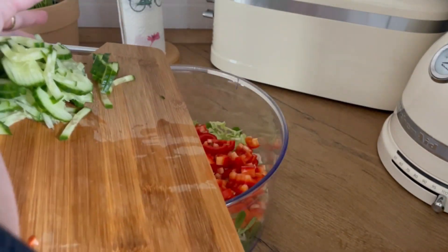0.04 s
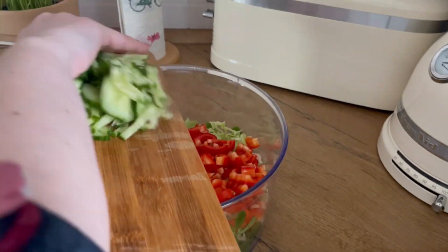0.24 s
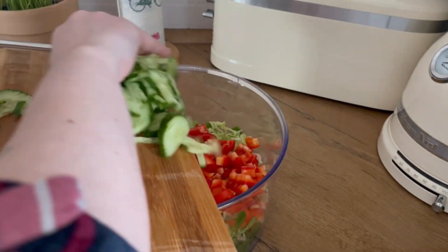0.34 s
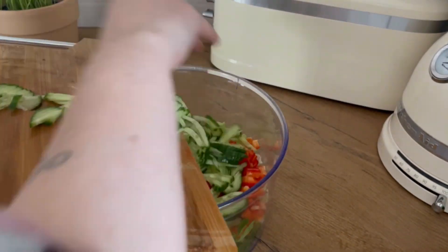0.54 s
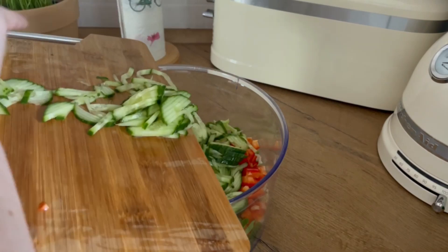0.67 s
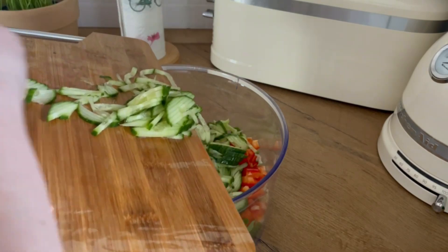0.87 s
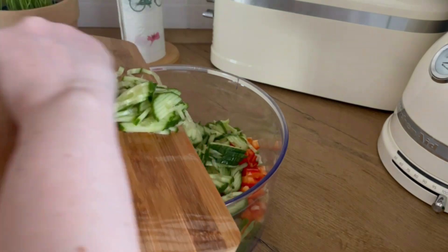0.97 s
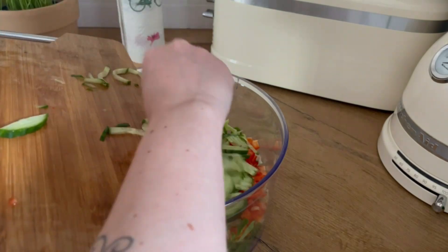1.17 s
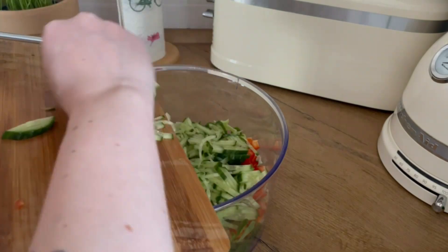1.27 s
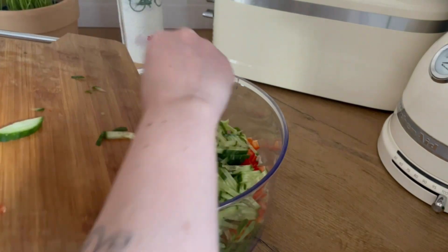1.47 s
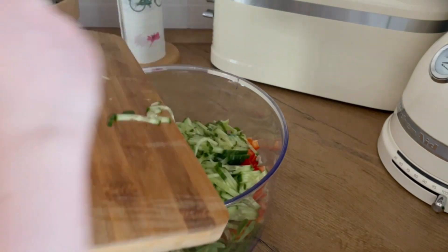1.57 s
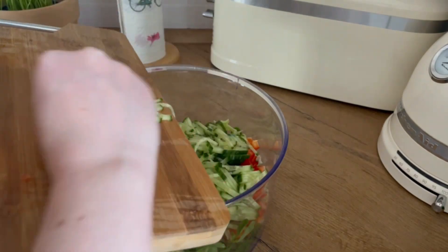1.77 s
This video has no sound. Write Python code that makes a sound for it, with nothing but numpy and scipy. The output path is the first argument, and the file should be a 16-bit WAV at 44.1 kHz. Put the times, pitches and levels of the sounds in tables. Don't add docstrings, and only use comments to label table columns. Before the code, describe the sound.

Chopped cucumber is scraped off a wooden board with a steel blade; a quick cluster of pieces thuds into a plastic bowl, then more scrapes and sharp metallic taps follow, close up in a quiet, humming kitchen.

```python
import sys
import numpy as np
from scipy import signal
from scipy.fft import rfft, irfft
from scipy.io import wavfile
from scipy.ndimage import uniform_filter1d

SR = 44100
rng = np.random.default_rng(int(sys.argv[2]) if len(sys.argv) > 2 else 0)


def boost(x):
    u = np.asarray(x, float) / 20
    return 10 ** u


def transcribe(signal):
    frames = np.atleast_2d(signal).T
    limited = np.clip(frames, -1, 1)
    pcm = np.round(limited * 32767).astype(np.int16)
    wavfile.write(sys.argv[1], SR, pcm)


N = 81585

# (frequency [Hz], density [dB per Hz])
FLOOR_SPECTRUM = [(60, -7), (150, -3.5), (225, 2), (320, -8.5), (440, -3), (900, -14), (2500, -29.5),
                  (16000, -46)]
FLOOR_DB = -61
HUM_HZ, HUM_DB, SECOND_HUM_DB = 117.3, -56, -5
BEAT_S, FIRST_DIP_S = 0.2836, 0.23

# (time [s], pressure [dB], wet hiss brightness [dB])
SWEEP_1 = [(0, -67, -8), (.025, -61, -4.5), (.055, -68, -11.5), (.126, -54, -3), (.195, -52.5, -10.5),
           (.228, -53.5, 3), (.288, -50.5, -12.5)]
SWEEP_2 = [(0.3, -58.5, -4.5), (0.326, -53.5, -2.5), (.4, -54.5, -11), (.44, -61.5, -1), (.52, -62, -6.5),
           (.535, -68, -13), (.575, -63.5, -5), (.6, -76, -8), (0.64, -69, -11)]
SWEEP_3 = [(0.675, -60.5, -14), (0.715, -71, -34), (0.814, -67, -30)]
SWEEP_4 = [(0.834, -48, -2), (0.849, -59, -2), (.875, -46.5, -12.5), (0.914, -53.5, -10), (.95, -49, -4),
           (.995, -53, -2), (1.113, -52.5, 0), (1.146, -46, -14), (1.159, -61.5, -10)]
SWEEP_5 = [(1.17, -66, -8), (1.19, -67.5, -19), (1.22, -60, -23), (1.245, -63, -24), (1.26, -75, -20),
           (1.292, -77, -19)]
SWEEP_6 = [(1.312, -59, -12), (1.325, -61.5, -8), (1.365, -55, -12), (1.38, -58.5, -7), (1.393, -54, -6),
           (1.406, -54, -4.5), (1.418, -49.5, -3), (1.428, -71, -7), (1.468, -87, -3)]
SWEEP_7 = [(1.661, -50, -7), (1.70, -46.5, -7), (1.74, -52, -12), (1.762, -62.5, 6.5), (1.78, -55.5, -3),
           (1.81, -55, -8), (1.82, -49.5, -6.5), (1.835, -52, -9), (1.85, -46, -13)]
# (frequency [Hz], density [dB per Hz])
RUB_SPECTRUM = [(180, -33), (300, -7.5), (360, -10), (447, -10.5), (1210, -5), (1340, -1.5), (2320, -12),
                (3240, -12.5), (16000, -8.5)]
# (frequency [Hz], width [Hz], level [dB])
BLADE_MODES = [(1335.6, 37, -0.5), (1624, 30, -6), (2730, 190, 4), (3166, 58, 5), (3715, 80, 0.5),
               (3860, 40, -3), (4124, 60, -9), (5115, 41, -7), (5147, 87, -1), (5910, 84, -13),
               (6410, 60, -2.5), (8060, 60, -7), (9590, 110, -11.5), (10480, 160, -12)]
GRIT_DB, GRIT_PER_S, PATCH_DB = 1, 2500, 2.5
RUB_RING_DB, GRIP_WANDER_DB = -4, 4

# (time [s], length
# [s], level [dB], first pitch [Hz], last pitch [Hz])
BOWL_BOOMS = [(0.237, 0.02, -31.5, 246, 241.5), (0.261, 0.025, -29.5, 244, 257),
              (0.298, 0.05, -44.5, 251, 231.6), (0.378, 0.021, -46.5, 244, 245),
              (0.412, 0.022, -44, 253, 242), (0.469, 0.021, -47.5, 225, 235),
              (0.509, 0.0266, -56.5, 237, 234), (0.798, 0.04, -49.5, 262, 237.4),
              (0.921, 0.019, -55.5, 237, 244), (0.992, 0.019, -47.5, 240, 217),
              (1.022, 0.028, -50.5, 201, 240), (1.161, 0.043, -52, 266, 251),
              (1.205, 0.042, -59.5, 256, 259), (.005, 0.036, -54.5, 242, 198.5),
              (.07, 0.038, -60.5, 203, 190), (.14, .03, -62, 195, 224)]
BOOM_RISE_FRACTION, BOOM_ROUGH_DB = 0.21, 2.5

# (time [s], level [dB], brightness [dB], one favoured ring [Hz], other favoured ring [Hz])
EDGE_TAPS = [(.030, -58, -6, 8100, 3150), (0.1, -49.5, 1, 6430, 3200), (0.2, -39, 8, 3080, 1380),
             (0.421, -58, -28, 5300, 5200), (0.436, -45.5, 4, 6760, 6400), (0.643, -49.5, -28, 3170, 3200),
             (0.6596, -35.5, -9, 3860, 3330), (0.8224, -25.5, 7.5, 4140, 6850),
             (1.2989, -35.5, 1.5, 3060, 1430), (1.45, -55.5, 8, 7100, 7100), (1.6502, -33, 16, 3860, 1290)]
CRACK_T60_S, TAP_RING_T60_S, TAP_RISE_S = 0.034, 0.025, 0.00028
TAP_RING_DB, TAP_FOCUS_DB = 3.5, 11
TAP_MODE_SCALE, TAP_DAMPING_POWER = 0.38, 0.21

# (time [s], frequency [Hz], level [dB], length [s], width [Hz])
BLADE_CATCHES = [(0.16, 3320, -59, 0.029, 150), (0.193, 5100, -57, 0.0073, 230),
                 (0.715, 5130, -69.5, 0.12, 300), (1.212, 4920, -66.5, 0.089, 500),
                 (0.497, 5000, -58, 0.052, 700), (0.555, 4200, -62, 0.025, 60),
                 (0.631, 3060, -68, 0.0067, 140), (.49, 2700, -61.5, 0.052, 300),
                 (1.387, 14600, -66, 0.04, 2500), (0.874, 3900, -54, 0.017, 120),
                 (0.949, 5120, -48, 0.011, 150), (0.97, 3080, -54.5, 0.027, 50),
                 (1.137, 5080, -50.5, 0.015, 200), (1.144, 2780, -52, 0.011, 250),
                 (1.08, 1345, -59.5, 0.069, 50), (1.087, 3715, -70, 0.043, 70),
                 (1.365, 3160, -52, 0.0077, 141), (1.403, 5210, -56, 0.019, 229),
                 (1.41, 3770, -52, 0.013, 172), (1.68, 1330, -56, 0.037, 150),
                 (1.701, 3660, -41.5, 0.013, 200), (1.706, 3230, -51, 0.035, 150),
                 (1.725, 2830, -56, 0.027, 200), (1.777, 6800, -53.5, 0.009, 500),
                 (1.814, 3780, -57, 0.015, 150), (1.83, 6480, -53.5, 0.06, 250)]

# (frequency [Hz], t60 [s], level [dB])
BOWL_MODES = [(500, 0.034, 0), (618, 0.063, -10.5), (702, 0.054, -4), (845, 0.017, -7), (945, 0.021, 6),
              (1073, 0.026, 0), (1310, 0.018, 0.5), (1873, 0.022, -3), (2720, 0.02, -8), (3010, 0.017, -4),
              (3364, 0.014, -13.5)]
# (time [s], wall level [dB], click level [dB], favoured wall pitch [Hz])
PIECE_DROPS = [(0.2336, -30, -24.5, 875), (.237, -20.5, -19, 816), (.241, -26, -25.5, 960),
               (.249, -32, -32, 804), (.258, -19.5, -28, 810), (.263, -21, -32, 940), (.268, -22, -28, 795),
               (.274, -29.5, -36, 750), (.282, -29, -42, 684), (.289, -34, -47, 960), (.296, -44, -39, 900),
               (.315, -38.5, -69, 690), (0.363, -44, -70, 1120), (.404, -37.5, -62, 710),
               (.412, -40.5, -64, 905), (.515, -50.5, -48.5, 850), (.772, -49, -55.5, 910),
               (.8235, -39.5, -51, 950), (0.995, -46, -69, 607), (1.161, -45, -64, 610),
               (.2905, -38, -50, 1040), (.435, -46.5, -60, 500), (1.3, -45, -81, 715),
               (1.39, -58, -61, 980)]
CLICK_DECAY_S, CLICK_DB, CLICK_CUTOFF_HZ = 0.0046, -2.5, 5000
WALL_FOCUS_DB = 6

# (time [s], length
# # [s], level [dB], frequency [Hz])
WALL_SLAPS = [(.2408, 0.0054, -13, 980), (0.25, 0.0039, -32, 870), (.2635, 0.0058, -27.5, 960),
              (0.27, 0.0046, -30, 1020), (0.28, .004, -26, 790), (0.2336, 0.0035, -28, 730),
              (.254, 0.0035, -34.5, 1100), (.2595, 0.00363, -26.5, 1254), (.2665, 0.0034, -29.5, 400),
              (.28, 0.0068, -33.5, 653), (0.41, 0.0053, -46, 940), (0.773, 0.013, -62, 950),
              (.239, .005, -31, 1887), (.2595, 0.0049, -37, 3000), (.2675, 0.0045, -33.5, 2950),
              (.266, 0.0058, -35.5, 1600), (1.4495, 0.0038, -59, 7000), (.433, .005, -52, 6300),
              (.418, 0.0068, -52, 4600)]
SLAP_SKEW = 0.98

ROOM_DB, ROOM_T60_S = -18, 0.16
LOW_CUT_HZ, BAND_EDGE_HZ = 106.6, 15650


def evened(x):
    return x / np.sqrt(np.mean(x ** 2) + 1e-20)


def coloured(x, spectrum):
    hz, db = np.transpose(spectrum)
    f = np.fft.rfftfreq(len(x), 1 / SR)
    gain = boost(np.interp(np.log(f + 1), np.log(hz), db))
    return irfft(rfft(x) * gain, len(x))


def resonate(x, hz, width_hz):
    r = np.exp(-np.pi * width_hz / SR)
    pole = r * np.exp(2j * np.pi * hz / SR)
    return 2 * signal.lfilter([1 - r], [1, -pole], x + 0j).real


def passed(x, hz, kind, order=2):
    return signal.sosfilt(signal.butter(order, hz, kind, fs=SR, output="sos"), x)


def drift(seconds):
    n = max(int(seconds * SR), 2)
    return evened(uniform_filter1d(uniform_filter1d(rng.standard_normal(N), n), n))


def add(mix, start_s, sound):
    part = mix[round(start_s * SR):][:len(sound)]
    part += sound[:len(part)]


def kitchen():
    t = np.arange(N) / SR
    first = np.cos(2 * np.pi * HUM_HZ * t)
    second = np.cos(2 * np.pi * (HUM_HZ * t + (t - FIRST_DIP_S) / BEAT_S))
    hum = first - boost(SECOND_HUM_DB) * second
    floor = evened(coloured(rng.standard_normal(N), FLOOR_SPECTRUM))
    return boost(FLOOR_DB + drift(0.03)) * floor + boost(HUM_DB) * hum


def patchy(x):
    z = signal.stft(x, nperseg=256)[2]
    patches = uniform_filter1d(rng.standard_normal(z.shape), size=6, axis=0)
    patches = evened(uniform_filter1d(patches, size=12, axis=1))
    return signal.istft(z * boost(PATCH_DB * patches), nperseg=256)[1][:N]


def blade_ring(force, wander):
    out = np.zeros(N)
    for (hz, width_hz, db), w in zip(BLADE_MODES, wander):
        out += boost(db + GRIP_WANDER_DB * w) * resonate(force, hz, width_hz) / np.sqrt(width_hz)
    return out


def rubbing():
    t, press, hiss = np.arange(N) / SR, np.zeros(N), np.zeros(N)
    for sweep in (SWEEP_1, SWEEP_2, SWEEP_3, SWEEP_4, SWEEP_5, SWEEP_6, SWEEP_7):
        s, db, bright_db = np.transpose(sweep)
        edge = np.clip(np.minimum(t - s[0], s[-1] - t) / 0.0095 + 1, 0, 1)
        press += edge * boost(np.interp(t, s, db))
        hiss += edge * boost(np.interp(t, s, db + bright_db))
    grain_level = boost(GRIT_DB * np.minimum(rng.exponential(1, N), 3.5))
    grit = grain_level * (rng.random(N) < GRIT_PER_S / SR) * rng.standard_normal(N)
    drive = (evened(grit) * 0.94 + rng.standard_normal(N)) * boost(1.3 * drift(0.012))
    rub = patchy(coloured(drive, RUB_SPECTRUM))
    low = evened(passed(rub, 6410, "low", order=4))
    high = evened(passed(rub, 5940, "high", order=4))
    wander = [drift(0.016) for _ in BLADE_MODES]
    scale = np.std(blade_ring(drive, wander))
    ring = passed(blade_ring(drive * press, wander), 8500, "low", order=3) / scale
    return 0.5 * press * low + hiss * high + boost(RUB_RING_DB) * ring


def booms():
    out, t = np.zeros(N), np.arange(6000) / SR
    rough = boost(BOOM_ROUGH_DB * drift(0.008))
    for s, length_s, db, first_hz, last_hz in BOWL_BOOMS:
        u = t / length_s
        hz = first_hz + (last_hz - first_hz) * np.minimum(u, 1)
        shape = np.minimum(u / BOOM_RISE_FRACTION, 1) * boost(-4 * u - 19 * np.maximum(u - 1, 0))
        add(out, s, boost(db + 1.5) * shape * np.sin(2 * np.pi * np.cumsum(hz) / SR))
    return out * rough


def taps():
    out, t = np.zeros(N), np.arange(2600) / SR
    for s, db, bright_db, top_hz, next_hz in EDGE_TAPS:
        crack = passed(rng.standard_normal(len(t)) * boost(-60 * t / CRACK_T60_S), 700, "high")
        crack = crack + (boost(bright_db) - 1) * passed(crack, 6800, "high")
        ring = np.zeros(len(t))
        for hz, _, mode_db in BLADE_MODES:
            focus = max(np.exp(-(8 * np.log(hz / f)) ** 2) for f in (top_hz, next_hz))
            decay_db = -60 * t / TAP_RING_T60_S * (hz / 3000) ** TAP_DAMPING_POWER
            level_db = TAP_MODE_SCALE * mode_db + TAP_FOCUS_DB * focus + decay_db
            ring += boost(level_db) * np.sin(2 * np.pi * (hz * t + rng.random()))
        rise = np.minimum(t / TAP_RISE_S, 1)
        sound = evened(passed(crack, 12000, "low")) + boost(TAP_RING_DB) * evened(ring)
        add(out, s, boost(db) * 0.07 * rise * sound)
    return out


def catches():
    out, t = np.zeros(N), np.arange(-4400, 4400) / SR
    for s, hz, db, length_s, width_hz in BLADE_CATCHES:
        sing = evened(resonate(rng.standard_normal(len(t)), hz, width_hz))
        add(out, s + t[0], boost(db) * sing * np.exp(-(t / length_s) ** 2 * 2))
    return out


def drops():
    out, t = np.zeros(N), np.arange(3300) / SR
    for s, wall_db, click_db, top_hz in PIECE_DROPS:
        click = passed(rng.standard_normal(len(t)), CLICK_CUTOFF_HZ, "low", order=3)
        sound = boost(click_db + CLICK_DB) * click * np.exp(-t / CLICK_DECAY_S)
        for hz, t60_s, db in BOWL_MODES:
            a, b, c = rng.random(3)
            focus_db = WALL_FOCUS_DB * (np.exp(-(6 * np.log(hz / top_hz)) ** 2) - 1)
            level_db = wall_db + focus_db if hz < 1500 else click_db
            level_db += db + 8.1 * (a - 0.5)
            rise = 1 - np.exp(-t * hz / 2.0)
            cycles = hz * (1 + 0.039 * (b - 0.5)) * t + 0.46 * c
            sound += boost(level_db - 60 * t / t60_s) * rise * np.sin(2 * np.pi * cycles)
        add(out, s, sound)
    return out


def slaps():
    out = np.zeros(N)
    for s, length_s, db, hz in WALL_SLAPS:
        t = np.arange(0, length_s, 1 / SR)
        swell = np.sin(np.pi * (t / length_s) ** SLAP_SKEW)
        add(out, s, boost(db) * swell * np.sin(2 * np.pi * hz * t))
    return out


def room(x):
    t = np.arange(16000) / SR
    tail = passed(rng.standard_normal(len(t)), 5800, "low", order=1)
    tail = tail * boost(-60 * t / ROOM_T60_S) * (t > 0.004)
    return signal.fftconvolve(x, tail / np.linalg.norm(tail))[:N]


def scene():
    near = rubbing() + booms() + taps() + catches() + drops() + slaps()
    return (near + boost(ROOM_DB) * room(near) + kitchen())[None]


def roll_off(x):
    return signal.sosfilt(signal.butter(12, 16570, fs=SR, output="sos"), x)


def record(dry):
    cut = passed(dry, LOW_CUT_HZ, "high", order=4)
    band = signal.firwin(255, BAND_EDGE_HZ, window=("kaiser", 9), fs=SR)
    mix = signal.oaconvolve(cut, band[None], "same")
    return roll_off(mix)


dry = scene()
out = record(dry)
transcribe(out)
```